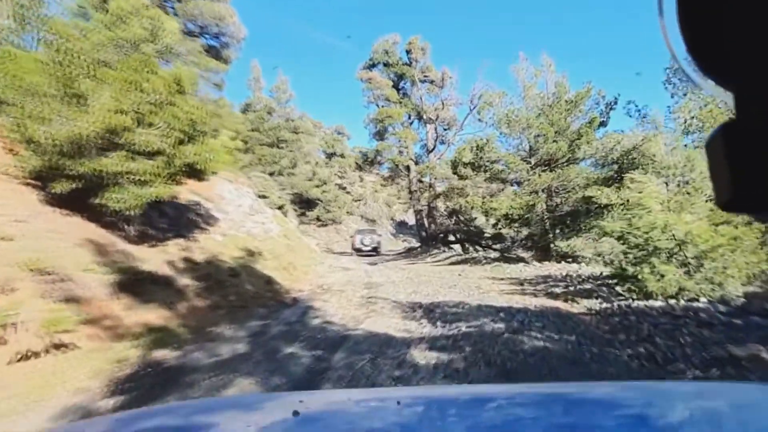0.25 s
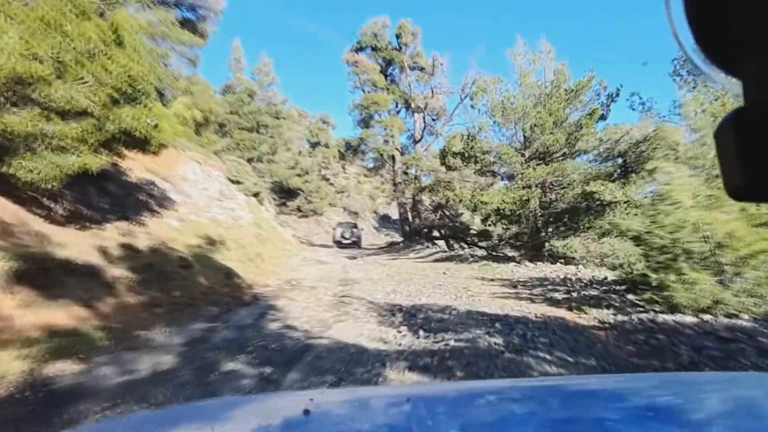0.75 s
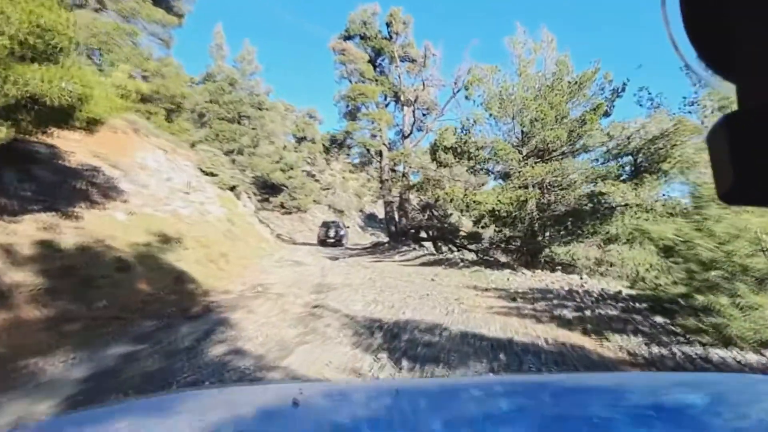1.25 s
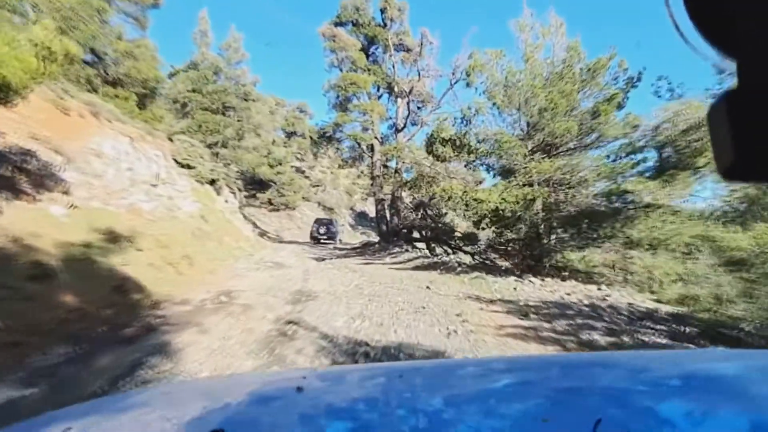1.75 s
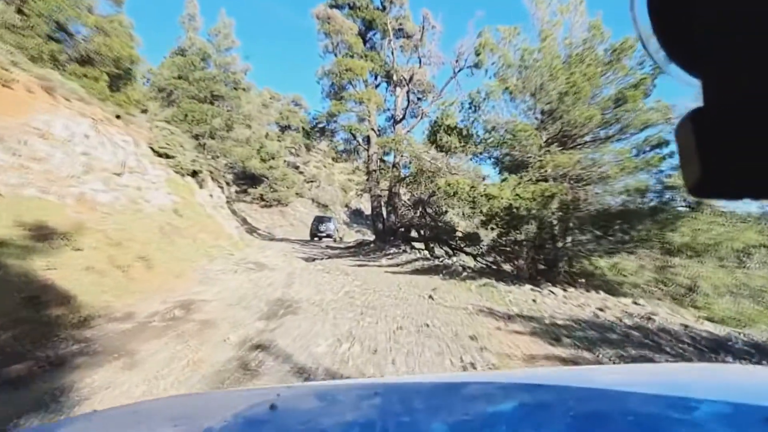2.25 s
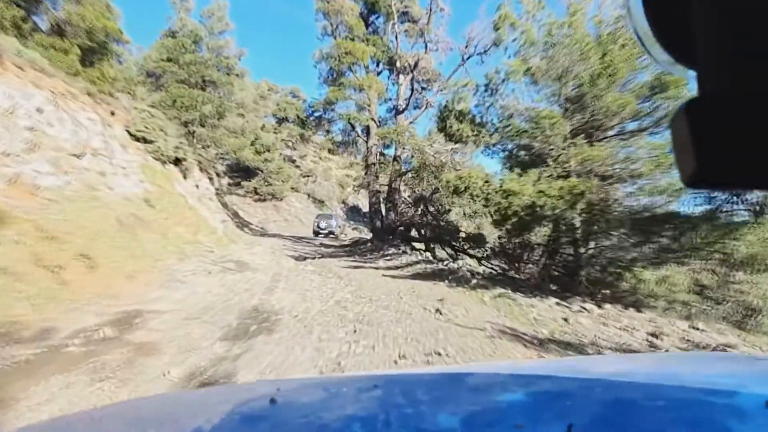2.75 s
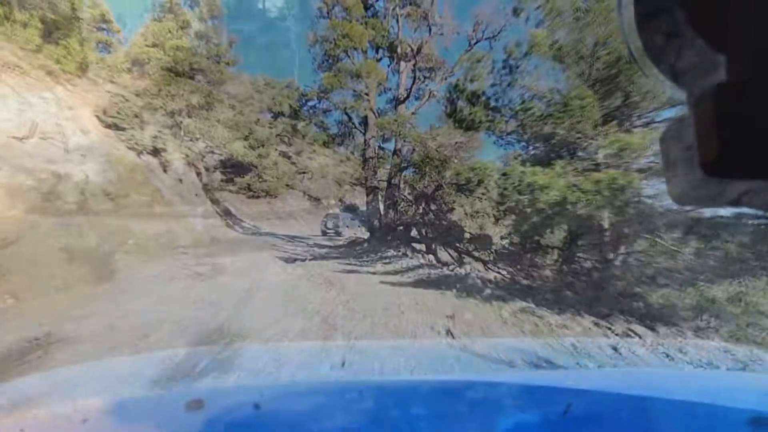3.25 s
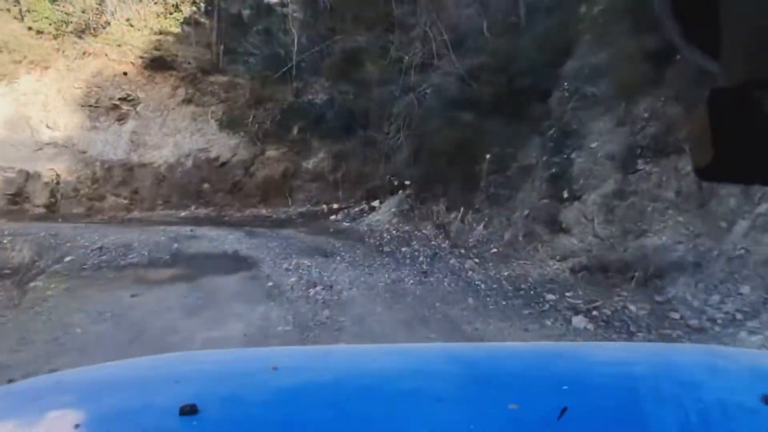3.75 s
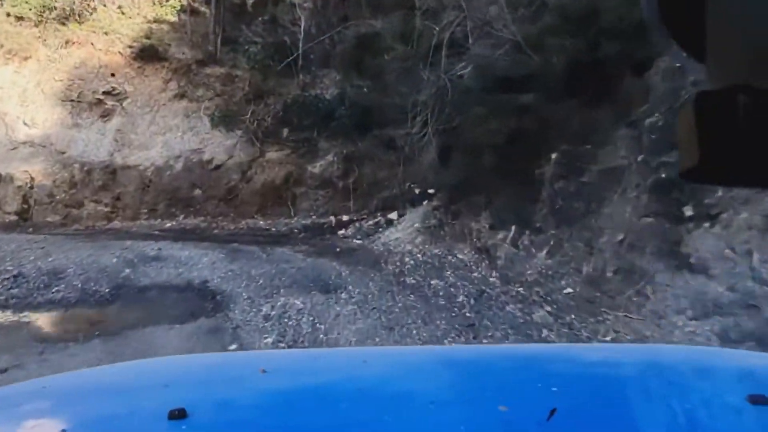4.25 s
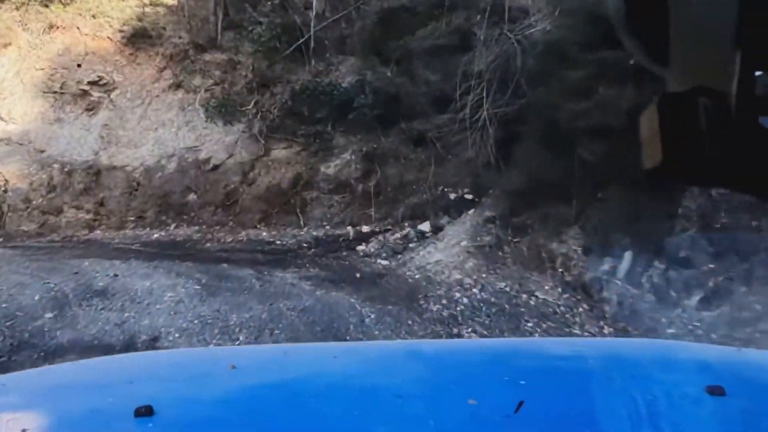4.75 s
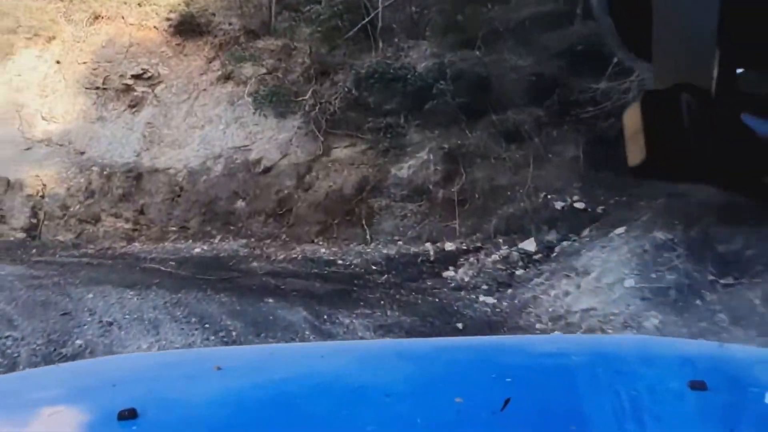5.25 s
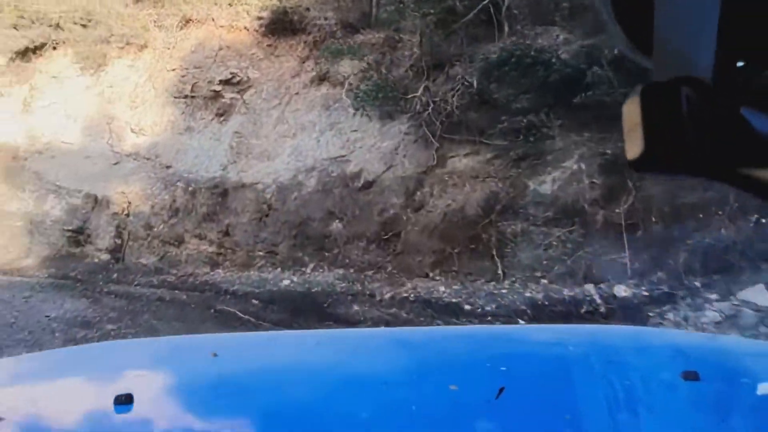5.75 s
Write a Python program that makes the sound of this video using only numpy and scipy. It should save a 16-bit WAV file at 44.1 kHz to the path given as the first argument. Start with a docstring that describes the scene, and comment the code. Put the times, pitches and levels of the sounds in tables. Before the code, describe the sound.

Inside a vehicle cabin on a rough stony track, heard through two close microphones with strong, mostly central bass. From 0 to about 3.3 seconds the driving is faster: a low wavering engine hum, a growling floor pan, broad tyre roar, buzzing trim and dense gravel ticks. Bumps boom and thump irregularly, with a heavy thud near 0.9, a sharper clatter and engine swell around 1.65, and more knocks from 2.0 to 3.15. Between 3.3 and 3.7 this crossfades into a slower stretch; the growl vanishes, the engine drops lower and weaker, and the roar becomes quieter and duller. Knocks and loose-fitting taps cluster at 4.0 to 4.3, a strong thump with a clack lands at 5.14, and a crisp crack comes at 5.85, as the road roar rises gently until the end at 6 seconds.

```python
"""Inside a vehicle cabin on a rough dirt track: a faster stretch dissolves into a slower one.
Engine orders, summed as sines, hum through the floor; noise in low resonances booms with the body's shaking.
Tyres roar through the panels as band-shaped noise; trim, stones and a loose fitting knock as short rings.
The floor pan growls at its resonances, trim rattles and gravel ticks; two close microphone ports hear it."""
import sys
import numpy as np
from scipy import signal
from scipy.fft import rfft, irfft, next_fast_len
from scipy.io import wavfile
from scipy.ndimage import uniform_filter1d

SR = 44100
rng = np.random.default_rng(int(sys.argv[2]) if len(sys.argv) > 2 else 0)


def materialize(psi):
    """Save the field psi as 16-bit PCM at rate SR to the path in sys.argv[1].

    A 1-D psi becomes a single channel; in a 2-D psi each row is a channel.
    """
    bounded = np.clip(np.atleast_2d(psi).T, -1, 1)
    quanta = np.round(bounded * 32767).astype(np.int16)
    wavfile.write(sys.argv[1], SR, quanta)


def volts(x):
    """Linear amplitude factor 10**(x/20) for a level x in dB, scalar or array-like."""
    e = np.asarray(x, float) / 20
    return 10 ** e


N = 265041
T = np.arange(N) / SR  # time of every sample in s
SIZE = next_fast_len(N)

# The engine in the faster stretch. Each row: time in seconds, crankshaft turns in Hz, relative level in dB.
FAST_ENGINE = [(0.0, 39.92, -35.5), (0.45, 41.08, -36), (0.75, 35.62, -36), (1.01, 37.06, -36.5),
               (1.31, 36.94, -35), (1.65, 40.28, -30.5), (2.06, 36.32, -36.5), (2.3, 35.7, -36),
               (2.65, 36.52, -35), (3.15, 32.75, -36), (3.5, 35.91, -37), (3.65, 35.45, -34)]
# The track under the tyres. Each row: time in seconds, relative levels in dB of the roar, of its treble
# and of the body shake.
TRACK = [(0.0, -3, 1, -28), (0.7, -1, -2.5, -28.5), (0.95, 1, 1, -24), (1.65, 0.5, 3.5, -26.5),
         (2.2, 1, -1.5, -29.5), (2.65, 0.5, 3, -21.5), (3.05, -2.5, 0.5, -31), (3.22, -3, -4, -29),
         (3.4, -7.5, -4.5, -31.5), (3.82, -8, -10, -21.5), (4.1, -6.5, -15, -22.5), (4.52, -8, 1.5, -28),
         (4.92, -7.5, -11, -29), (5.26, -4.5, -6, -27), (5.64, -4, 2.5, -27.5), (6.01, -2.5, -10, -32)]


def unit(x):
    """Normalization: scales a signal to rms 1."""
    return x / np.sqrt(np.mean(x ** 2))


def curves(table):
    """Linear interpolation: the columns of a timed table at every sample."""
    s, *columns = np.transpose(table)
    return [np.interp(T, s, column) for column in columns]


def colour(points, hz):
    """Spectral envelope: dB of (Hz, dB) points joined on a log-frequency axis."""
    f, db = np.transpose(points)
    return np.interp(np.log(hz + 1), np.log(f), db)


def walk(rate):
    """Slow random modulation: levels held 1 / rate s and slewed twice, with a spread near 1."""
    hold = int(SR / rate)
    steps = np.repeat(rng.standard_normal(N // hold + 1), hold)
    return 1.29 * uniform_filter1d(uniform_filter1d(steps, hold), hold)[:N]


def ringing(modes):
    """Resonance: two unrelated noises (mid, side) pass steep peaks given as (Hz, width Hz, dB)."""
    hz = np.fft.rfftfreq(SIZE, 1 / SR) + 1e-3
    shape = sum(volts(db) / (1 + ((hz - f * f / hz) / width) ** 2) for f, width, db in modes)
    noise = rng.standard_normal((2, SIZE))
    return unit(irfft(rfft(noise) * shape, SIZE)[:, :N])


def engine_stretch(table, orders, rise_s, fall_s):
    """Harmonic series of a rotating shaft: each order wavers by itself; the stretch fades in and out."""
    hz, level_db = curves(table)
    hz = uniform_filter1d(hz, SR // 8)  # the flywheel rounds each change of speed
    turn = 2 * np.pi * np.cumsum(hz) / SR
    quarter_cycle = np.array([[0], [np.pi / 2]])  # side leads mid
    out = 0
    for order, mid_db, side_db, waver_db in orders:
        angle = order * turn + rng.uniform(0, 2 * np.pi) + quarter_cycle
        gain = volts([[mid_db], [side_db]]) * volts(waver_db * walk(13))
        out = out + gain * np.sqrt(2) * np.sin(angle)
    fade = np.clip((T - rise_s) / 0.23, 0, 1) * np.clip((fall_s - T) / 0.42, 0, 1)
    return out * volts(uniform_filter1d(level_db, SR // 5)) * fade


def engine():
    """Superposition: the orders of the faster and the slower stretch add as one fades into the other."""
    # The slower stretch. Each row: time in seconds, crankshaft turns in Hz, relative level in dB.
    slow_engine = [(3.45, 30.21, -32), (3.78, 31.78, -37), (4.5, 31.73, -39), (4.9, 30.53, -36.5),
                   (6.01, 29.17, -38.5)]
    # Engine orders. Each row: multiple of the crankshaft, mid and side gain in dB, waver in dB.
    fast_orders = [(2, 7, -14, 1.2), (3, -1, -22, .8), (4, 2, -8, .7), (6, -16, -18, 1.5),
                   (8, -19, -17, 1.5)]
    slow_orders = [(2, 0, -13.5, 4), (3, -7.5, -22, 1.5), (4, -1.5, -17, .7), (8, -17, -13, 3.4)]
    fast = engine_stretch(FAST_ENGINE, fast_orders, -1, 3.695)
    return fast + engine_stretch(slow_engine, slow_orders, 3.44, 7)


def body():
    """Forced low resonance: bumps shake the wheels and pump the cabin air, mostly alike at both ports."""
    # Wheel hop and cabin boom. Each row: centre in Hz, width in Hz, relative level in dB.
    hop_modes = [(20.66, 9.6, 0)]
    boom_modes = [(30.4, 15, -4.5), (40.5, 5, -3.5), (48.5, 19, 7.5)]
    # Bumps that shake the wheels. Each row: time of the strongest shake in seconds, relative hop in dB.
    bumps = [(0.35, -24), (0.48, -19), (0.65, -25), (0.82, -22), (1.02, -19.5), (1.4, -27), (1.5, -22.5),
             (1.61, -14.5), (1.92, -24), (2.29, -17.5), (2.51, -18.5), (2.61, -17), (2.75, -19.5),
             (2.96, -20), (3.08, -22), (3.78, -21), (4.122, -26), (4.57, -21), (4.93, -20.5), (5.3, -38),
             (5.73, -27), (5.959, -19.5)]
    # Single booms on a low cabin note. Each row: time of the peak in seconds, note in Hz, peak in dB.
    booms = [(0.363, 38.93, -18), (0.694, 50.05, -18.5), (0.819, 27, -28), (0.941, 52, -24),
             (1.17, 52, -24.5), (1.256, 50, -32), (1.519, 41, -20.5), (1.626, 41, -22.5),
             (1.859, 47.15, -25), (2.082, 29.9, -17.5), (2.147, 52.98, -16.5), (2.279, 51.9, -19.5),
             (2.29, 43.1, -23.5), (2.549, 41.14, -21), (2.578, 53.5, -19), (2.769, 40.2, -28),
             (3.07, 26.8, -32), (3.66, 52, -22.5), (3.823, 42.14, -19), (3.961, 34, -22),
             (4.122, 30.8, -17), (4.574, 27.8, -21.5), (4.612, 50.03, -20), (4.757, 38, -24.5),
             (4.964, 48, -22), (5.143, 49.3, -19), (5.279, 51.9, -23), (5.351, 38.7, -17.5),
             (5.544, 33, -20.5), (5.739, 45.5, -20), (5.955, 40.1, -18)]
    rise_s, fall_s, boom_s = 0.034, 0.032, 0.073  # Gaussian time constants

    s, hop_db = np.transpose(bumps)
    since = T - s[:, None]
    swells = np.exp(-(since / np.where(since < 0, rise_s, fall_s)) ** 2)
    shake_db = curves(TRACK)[2]
    hop = np.sqrt(volts(hop_db) ** 2 @ swells + volts(shake_db - 2) ** 2)
    out = 0
    for modes, strength in ((hop_modes, hop), (boom_modes, volts(shake_db - 2.5))):
        ring = ringing(modes)
        # the track sets the strength, so the chance swell of the ring is mostly evened out
        swell = np.sqrt(uniform_filter1d(ring[0] ** 2, int(0.09 * SR)) + 1e-6)
        out = out + ring / swell ** 0.96 * strength * volts(-0.5) * volts([[0], [-24]])
    for s, hz, db in booms:
        near = abs(T - s) < 3 * boom_s
        envelope = np.exp(-((T[near] - s) / boom_s) ** 2)
        tone = np.sin(2 * np.pi * hz * T[near] + rng.uniform(0, 2 * np.pi))
        out[0, near] += volts(db) * envelope * tone
    return out


def roar():
    """Filtered broadband noise: half-octave bands; jolts swell the upper bands together, grit pricks them."""
    # Spectrum of the panels. Each row: frequency in Hz, relative density in dB per Hz.
    panels = [(40, -48), (58, 6), (85, -2.5), (110, -8.5), (170, -9), (230, -12.5), (340, -14.5),
              (500, -21.5), (820, -26), (1000, -31), (1340, -30.5), (1480, -37.5), (2200, -38),
              (3300, -41.5), (3900, -47), (6700, -47), (8800, -56), (15500, -58), (16000, -70)]
    # Centres in Hz of the low, middle and high roar and the treble.
    region_hz = (300, 1000, 3500, 11000)
    # How far the low, middle and high roar follow the track, as factors of its dB.
    track_share = (0.62, 0.7, 1.13)
    jolt_db, flicker_db, grit_db = 0.7, 1.6, 1.7

    hz = np.fft.rfftfreq(SIZE, 1 / SR) + 1e-3
    roar_db, treble_db, _ = curves(TRACK)
    levels = [share * roar_db for share in track_share] + [treble_db]
    # about 150 grit strikes a second, each fading with a time constant of 6.6 ms
    grit = (rng.random(N) < 150 / SR) * volts(grit_db * rng.exponential(size=N))
    grit = signal.lfilter([1], [1, -np.exp(-1 / (0.0066 * SR))], grit)
    noise = rng.standard_normal((2, N))
    spectrum = volts(colour(panels, hz))
    smooth = rfft(noise, SIZE) * spectrum
    gritty = rfft(unit(noise * (1 + 0.27 * grit)), SIZE) * spectrum
    jolt = walk(14)
    slower = np.clip((T - 3.3) / 0.4, 0, 1)
    out = 0
    for centre in 2 ** np.arange(6, 14.1, 0.5):
        band = np.clip(1 - abs(np.log2(hz / centre)) / 0.5, 0, 1)
        high = np.clip(np.log2(centre / 200), 0, 1)
        # blend the levels of the two neighbouring regions
        place = np.interp(np.log(centre), np.log(region_hz), np.arange(4))
        below, blend = int(place), place % 1
        db = levels[below] * (1 - blend) + levels[min(below + 1, 3)] * blend
        if 100 < centre < 200:
            db = db - 2 * slower  # this rumble eases in the slower stretch
        db = db + high * jolt_db * jolt + flicker_db * walk(9)
        out = out + irfft(band * (smooth * (1 - high) + gritty * high), SIZE)[:, :N] * volts(db)
    return out * volts(-5)


def blows(times, level_db, t60_s, attack_s, notes_hz=None):
    """Impulsive excitation: a quick rise, then a steepening fall; with notes, each blow rings a sine."""
    out = np.zeros(N)
    for k, (s, db) in enumerate(zip(times, level_db)):
        i = int(s * SR)
        t = T[:min(int(2 * t60_s * SR), N - i)]
        shape = (1 - np.exp(-t / attack_s)) * np.exp(-np.log(1000) * (t / t60_s) ** 1.55)
        tone = 1 if notes_hz is None else np.sin(2 * np.pi * notes_hz[k] * t)
        out[i:i + len(t)] += volts(db) * shape * tone
    return out


def struck(notes, times, level_db, t60_s, attack_s):
    """Modal excitation: every blow rings the same notes, varied in strength and tuning in mid and side."""
    out = np.zeros((2, N))
    for port in range(2):  # mid, side
        for hz, db in notes:
            strength, detune = rng.standard_normal((2, len(times)))
            out[port] += blows(times, level_db + db + 2 * strength, t60_s, attack_s,
                               hz * (1 + 0.015 * detune))
    return out


def knocks():
    """Impact and modal decay: bumps thump the floor and shake trim and metal; loose parts ring notes."""
    # Knocks. Each row: start in seconds, relative levels in dB of thud, knock, crack and fizz.
    impacts = [(0.214, -38, -49, -57, -54), (0.425, -47, -46, -51, -52.5), (0.552, -38, -39.5, -49.5, -80),
               (0.734, -41, -57, -56, -54), (0.842, -26, -47, -45, -52), (0.896, -24.5, -33, -41.5, -74),
               (0.905, -15.5, -29, -48.5, -72), (0.992, -30, -38, -43.5, -50), (1.167, -24, -59, -52, -54),
               (1.361, -40, -58, -50.5, -64), (1.393, -28.5, -41, -54, -72), (1.583, -41, -52, -47, -59),
               (1.644, -30, -31.5, -36.5, -51), (1.655, -33, -36, -48, -60), (1.698, -32, -36, -50, -55),
               (1.965, -44, -54, -45.5, -73), (2.005, -30, -43, -66, -75), (2.096, -27.5, -43, -49, -48.5),
               (2.162, -53, -49, -51, -58), (2.252, -45, -43, -48, -57), (2.286, -29, -41, -53, -72),
               (2.383, -25, -40, -46, -71), (2.45, -45, -56, -62, -55.5), (2.534, -49, -51, -51, -56),
               (2.674, -48, -59, -49.5, -61), (2.79, -51, -46, -48, -56), (2.808, -41, -56, -50, -61),
               (3.072, -26.5, -51, -50, -59), (3.148, -31.5, -37, -51.5, -63), (3.324, -40, -43, -54, -71),
               (3.572, -43, -48, -48, -69), (3.676, -38, -43, -46.5, -54.5), (3.72, -50, -47, -54, -59),
               (3.888, -48, -57, -56.5, -58), (3.925, -46, -45, -72, -77), (3.957, -41, -56, -50, -62),
               (4.008, -32, -48, -51.5, -56.5), (4.06, -32, -42, -45, -61), (4.108, -26.5, -34.5, -49, -61),
               (4.128, -31.5, -44, -48.5, -56.5), (4.146, -29, -26, -42, -54.5),
               (4.236, -42, -31, -47, -58.5), (4.475, -43, -41, -67, -58), (4.507, -44, -37.5, -67, -56),
               (4.648, -48, -40, -61, -74), (4.905, -50, -57, -60, -63), (5.007, -50, -62, -54, -62),
               (5.082, -36, -38, -58, -62), (5.105, -52, -44, -54, -64), (5.139, -18, -30.5, -55.5, -76),
               (5.237, -38, -38, -63, -56), (5.296, -37, -44, -59, -69), (5.436, -39, -40, -69, -68),
               (5.565, -34, -38.5, -63, -56), (5.751, -45, -40, -68, -72), (5.785, -42, -37, -65, -61),
               (5.848, -58, -26, -35.5, -52), (5.856, -56, -33.5, -49, -55.5)]
    # Resonances of each kind. Each row: centre in Hz, width in Hz, relative level in dB.
    thud_modes = [(236, 110, -9.5), (375, 52, -11), (575, 100, -5)]
    knock_modes = [(676, 430, 8.5), (1026, 250, -12), (1200, 340, 4)]
    crack_modes = [(1810, 1600, 8.1), (2836, 98, 5.5), (3400, 1100, 3)]
    fizz_modes = [(4480, 1600, 10), (6600, 2300, 6.5), (11500, 7300, -11.5)]
    # Notes of the floor, trim, bare metal and loose fitting. Each row: note in Hz, relative level in dB.
    floor_notes = [(200, -11), (235, -5.5), (268, -5)]
    trim_notes = [(410, -6.5), (684, -6), (835, -9), (1155, -11)]
    metal_notes = [(1690, -1), (1860, -4.5), (2150, 0.5), (2515, -2), (3050, -2), (3480, -5.5), (3950, -9)]
    fitting_notes = [(1120, -2), (1190, -0.5), (1290, -8), (1900, -23)]
    # Taps of the loose fitting. Each row: start in seconds, relative level in dB.
    tap_times = [(1.036, -39), (1.1397, -39), (1.165, -37), (2.389, -38), (2.3002, -37), (2.637, -41),
                 (2.737, -39), (3.377, -40), (3.4593, -40), (3.578, -39), (3.661, -41), (3.999, -39.5),
                 (4.083, -29.5), (4.194, -31.5), (4.283, -39), (4.354, -48), (4.44, -47), (4.475, -45),
                 (4.515, -42), (4.625, -47), (5.143, -29.5), (5.299, -38), (5.471, -38.5)]
    # Single struck notes: high pings of stones on the underbody, low knocks of the body.
    # Each row: start in seconds, relative level in dB, note in Hz.
    single_notes = [(0.155, -57, 4150), (0.296, -52, 1500), (0.32, -52, 2140), (0.418, -53, 4950),
                    (0.523, -46, 2200), (0.955, -49, 2650), (1.035, -56, 2720), (1.415, -51, 2160),
                    (1.158, -31, 305), (1.394, -29.5, 523), (1.583, -47, 1700), (1.645, -42, 2200),
                    (1.707, -48, 2080), (1.772, -45, 1750), (2.005, -32, 480), (3.14, -29.5, 412),
                    (4.15, -42, 2526), (2.163, -51, 2700), (2.193, -54, 2060), (2.538, -50, 1997),
                    (2.756, -48, 1920), (3.193, -50, 2170), (1.16, -47, 2310), (1.365, -47.5, 2870),
                    (2.257, -52, 2140), (2.318, -53, 2970), (2.388, -47, 2106), (2.515, -48, 2020),
                    (2.762, -50, 3210), (2.806, -51, 3070), (3.0992, -47, 2205), (3.147, -53, 3330),
                    (3.271, -49, 2210), (4.03, -55, 2100), (4.105, -46, 2890), (4.268, -56, 3410),
                    (4.56, -51, 1880), (4.632, -53, 1870)]
    # Partials of each single note. Each row: multiple of the note, relative level in dB.
    note_partials = [(1, 1.5), (1.11, -14), (.87, -6)]

    s, thud_db, knock_db, crack_db, fizz_db = np.transpose(impacts)
    thump = struck(floor_notes, s, thud_db, 0.057, 0.0016) * volts([[0], [-3]])
    thud = ringing(thud_modes) * blows(s, thud_db - 15, 0.0868, 0.0017)
    knock = ringing(knock_modes) * blows(s, knock_db - 6.5, 0.07, 0.0011)
    knock = knock + struck(trim_notes, s, knock_db + 0.5, 0.048, 0.0018)
    crack = ringing(crack_modes) * blows(s, crack_db - 3, 0.0686, 0.0011)
    crack = crack + struck(metal_notes, s, crack_db - 7, 0.074, 0.0019)
    fizz = ringing(fizz_modes) * blows(s, fizz_db, 0.0987, 0.0023) * volts([[0], [-0.5]])

    s, tap_db = np.transpose(tap_times)
    taps = sum(blows(s, tap_db + db, 0.034, 0.0016, np.full(len(s), hz)) for hz, db in fitting_notes)
    s, note_db, note = np.transpose(single_notes)
    singles = sum(blows(s, note_db + db, 0.0544, 0.0009, ratio * note) for ratio, db in note_partials)
    return thump + thud + knock + crack + fizz + (taps + singles) * volts([[0], [-9]])


def growl():
    """Source and resonator: upper engine orders and road noise sound where the floor pan resonates."""
    # Floor pan under load. Each row: centre in Hz, width in Hz, relative level in dB.
    pan_modes = [(294, 55, -14.5), (388.3, 35, -2.5), (432.6, 42, -4.5)]
    # How strongly the pan sings. Each row: time in seconds, lower and upper strand in relative dB.
    strand_table = [(0, -3, -15), (0.15, 6.5, -19), (0.6, 0.5, -1), (0.8, -8, -4), (1.0, -9, 4),
                    (1.4, -12, 4.5), (1.55, 2.5, -7), (1.65, 2.5, 2.5), (1.85, -12, -3.5), (2.05, 3, -9),
                    (2.22, -1, 5), (2.45, -1.5, -3), (2.7, -8, 2), (2.9, -16, 4.5), (3.02, -12, -12),
                    (3.15, 2, 2.5), (3.5, -12, -7)]
    order_db, noise_db = -6, -11

    hz, load_db = curves(FAST_ENGINE)
    turn = 2 * np.pi * np.cumsum(hz) / SR
    strands = [0] + curves(strand_table)  # the lowest mode stays steady
    out = 0
    for mode, strand_db in zip(pan_modes, strands):
        out = out + volts(noise_db + mode[2] + strand_db) * ringing([mode])
    for order in range(9, 14):
        gain = 0
        for (f, width, db), strand_db in zip(pan_modes, strands):
            gain = gain + volts(db + strand_db) / (1 + (2 * (order * hz - f) / width) ** 2)
        tone = np.sin(order * turn + rng.uniform(0, 2 * np.pi, (2, 1)))
        out = out + volts(order_db + 2.1 * walk(11.34)) * gain * tone
    return out * volts(uniform_filter1d(load_db, SR // 2)) * np.clip((3.5 - T) / 0.34, 0, 1)


def rattle():
    """Random impulses into resonators: loose trim ticks in clumps, harder when the road is louder."""
    # Loose trim. Each row: centre in Hz, nominal width in Hz, relative level in dB.
    trim_modes = [(820, 280, -16), (1250, 106, 5), (1823, 84, -4.5), (2790, 140, -11), (3330, 340, -7)]
    ticks_per_s, spread_db = 140, 1.8  # rate before the clumping
    out = 0
    for f, width, db in trim_modes:
        chance = ticks_per_s / SR * volts(4.5 * walk(12))
        ticks = (rng.random(N) < chance) * volts(spread_db * rng.exponential(size=N))
        pole = np.exp((2j * np.pi * f - 1.2 * np.pi * width) / SR)
        # a padded contact: with a double pole the ring swells for a moment before it fades
        ring = signal.lfilter([1 - abs(pole)], np.poly([pole, pole]), ticks)
        # mid and side carry each ring a quarter cycle apart
        out = out + volts(db) * np.array([ring.imag, ring.real])
    return out * volts(-52.5 + 0.9 * curves(TRACK)[0])


def gravel():
    """Granular impacts: grains in bursts each ring a tiny note, denser where the track roars."""
    candidates, low_hz, high_hz = 900, 890, 4260
    s, pitch, size, keep, side = rng.random((5, candidates))
    s = s * T[-1]
    busy_db = (3.8 * curves(TRACK)[0] + 3.6 * walk(15))[(s * SR).astype(int)]
    on = keep < 0.45 * volts(busy_db)
    hz = low_hz * (high_hz / low_hz) ** pitch
    db = -61.5 - 3 * np.log(size + 0.03) - 3.9 * pitch  # higher notes are fainter

    def grains(pick):
        """Superposition: the rings of the chosen grains add."""
        return blows(s[pick], db[pick], 0.039, 0.0012, hz[pick])

    left, right = grains(on & (side < 0.5)), grains(on & (side >= 0.5))
    return np.array([left + right, left - right])


def scene():
    """Sum and difference stereo: mid and side of all sources are turned into left and right."""
    # Side against mid between the ports. Each row: frequency in Hz, gain of the side in dB.
    port_balance = [(60, -33), (130, -31), (200, -8), (300, -2), (460, 4), (570, 7), (690, 7), (850, 4.5),
                    (1200, 6.5), (1700, 4.5), (2300, -1), (3000, 3.5), (6000, -2.5), (7800, -4),
                    (9500, -4.5), (15000, -3)]
    mid, side = roar() + growl() + rattle() + gravel() + knocks()
    side = irfft(rfft(side) * volts(colour(port_balance, np.fft.rfftfreq(N, 1 / SR))), N)
    low = engine() + body()
    # the bass reaches the right port a little stronger
    low[1] -= 0.048 * low[0]
    mid, side = mid + low[0], side + low[1]
    return np.array([mid + side, mid - side])


def band_limit(x):
    """A steep low-pass at the top of the band."""
    return signal.sosfilt(signal.butter(12, 15800, fs=SR, output="sos"), x)


def record(dry):
    """High-pass filtering and soft saturation: the lowest rumble is cut and the tallest peaks rounded."""
    wet = signal.sosfilt(signal.butter(2, 12, "high", fs=SR, output="sos"), dry)
    wet = wet / (1 + (abs(wet) / 0.5) ** 6) ** (1 / 6)  # levels off at 0.5
    return band_limit(wet)


dry = scene()
out = record(dry)
materialize(out)
```